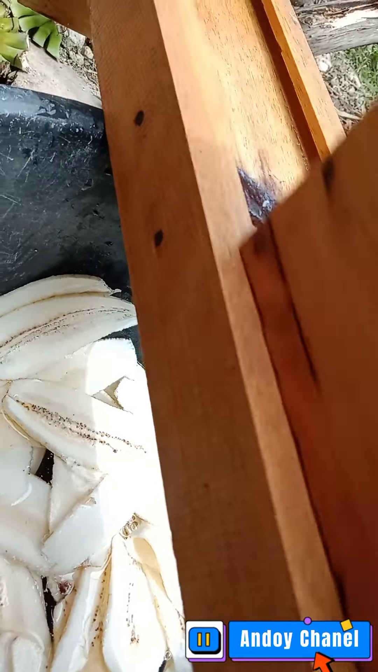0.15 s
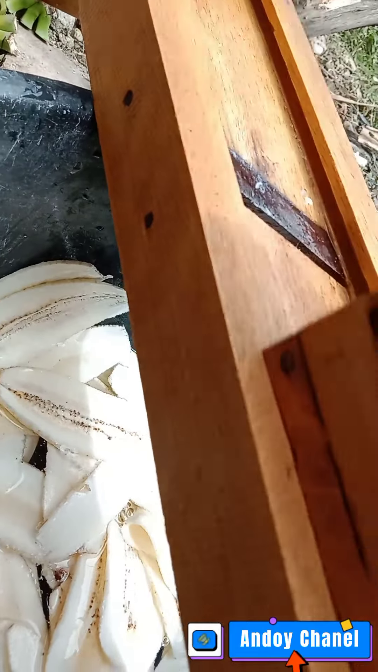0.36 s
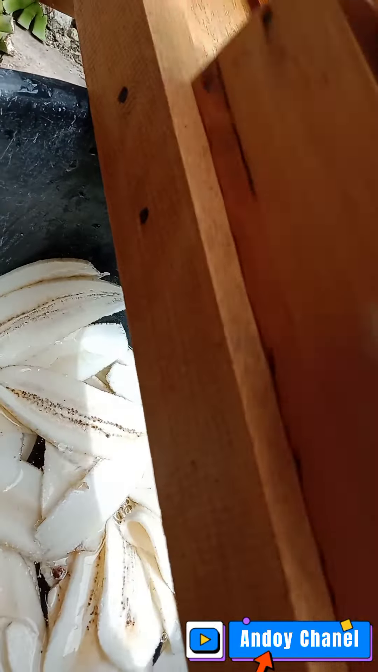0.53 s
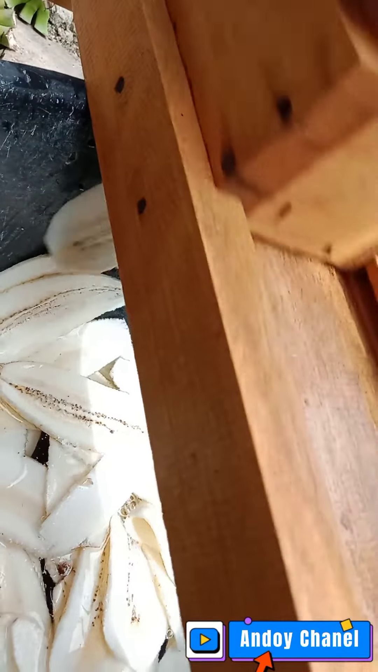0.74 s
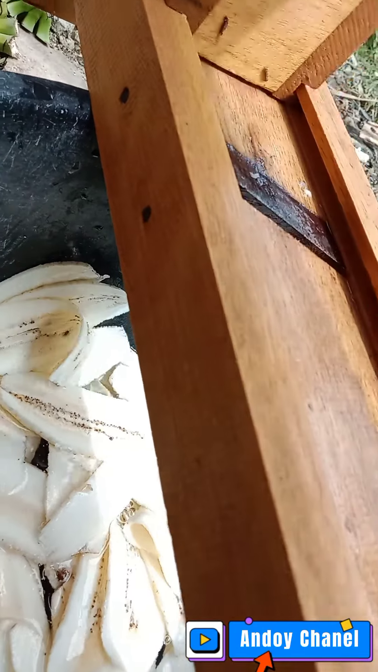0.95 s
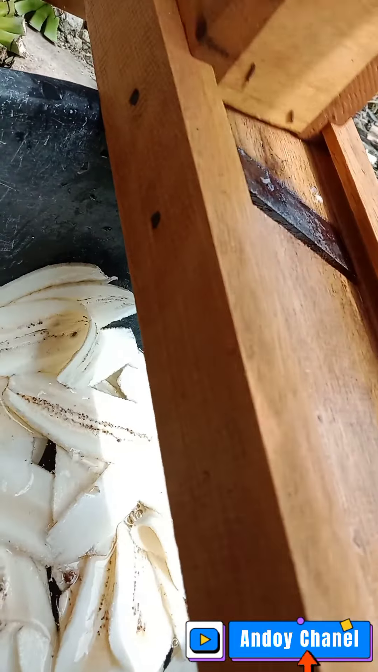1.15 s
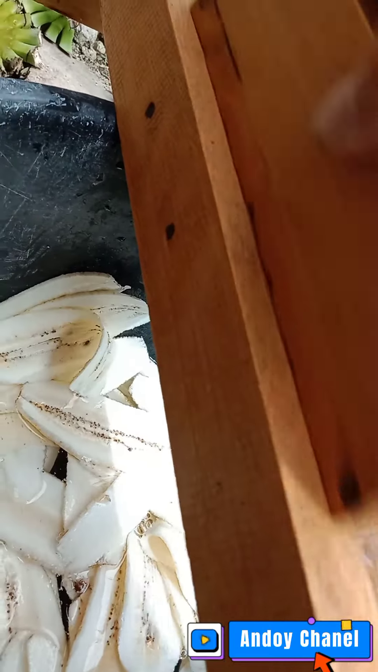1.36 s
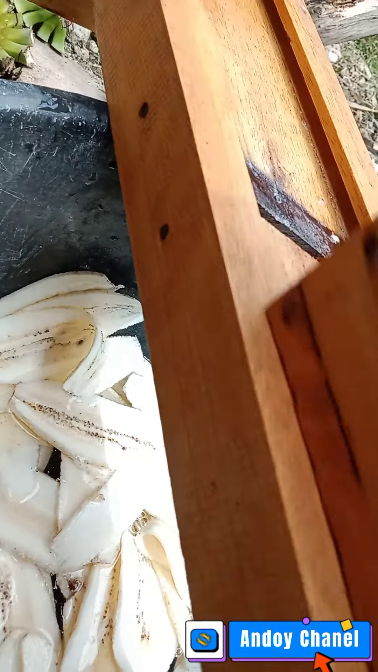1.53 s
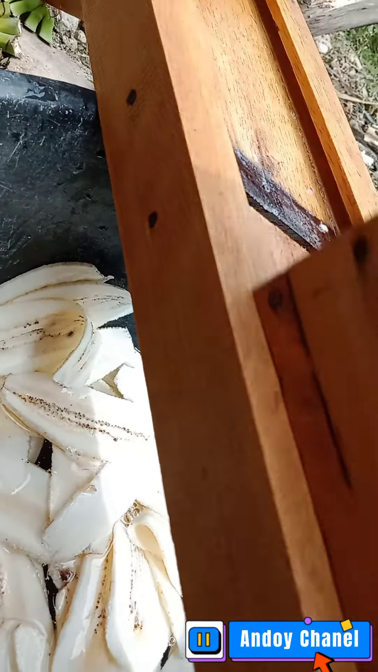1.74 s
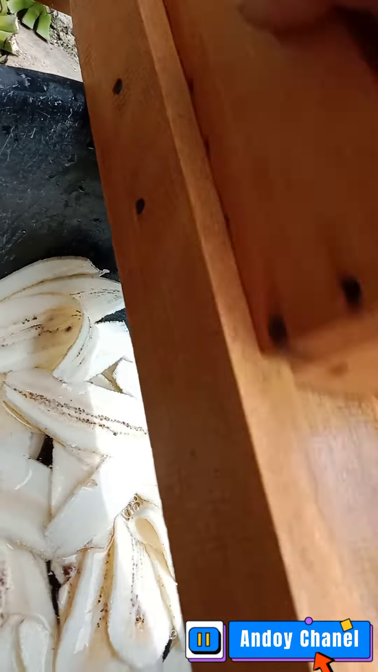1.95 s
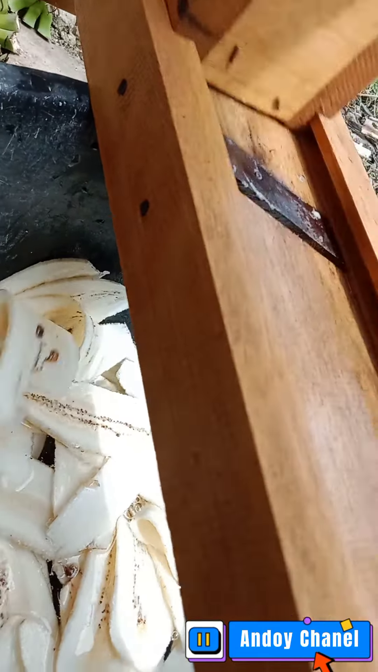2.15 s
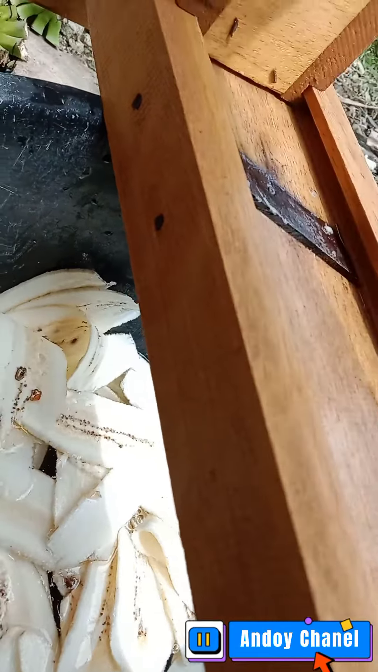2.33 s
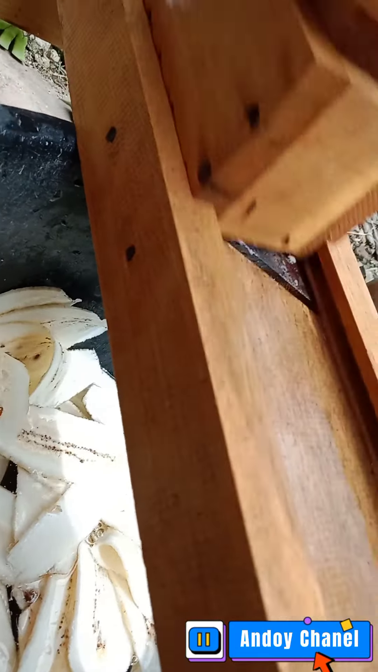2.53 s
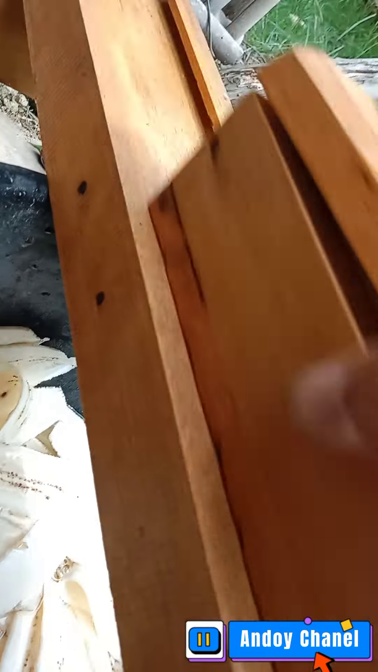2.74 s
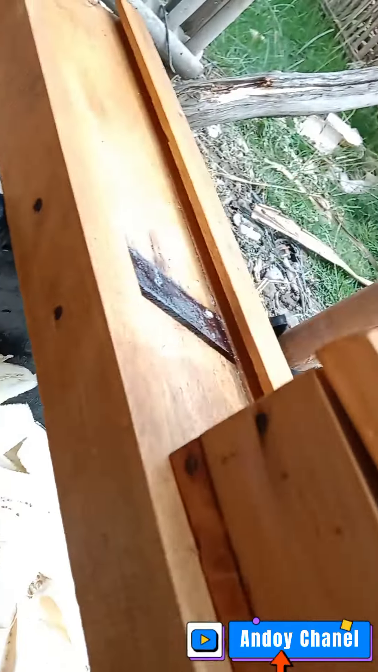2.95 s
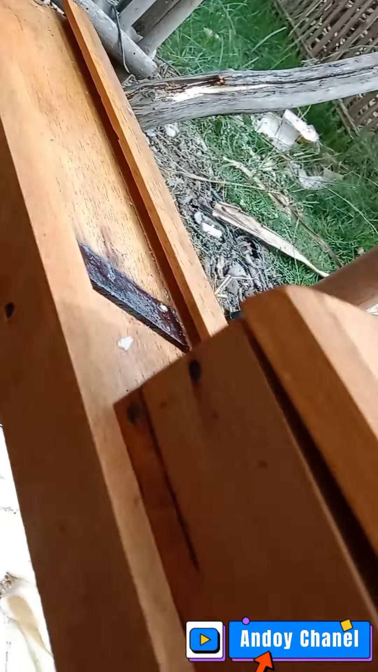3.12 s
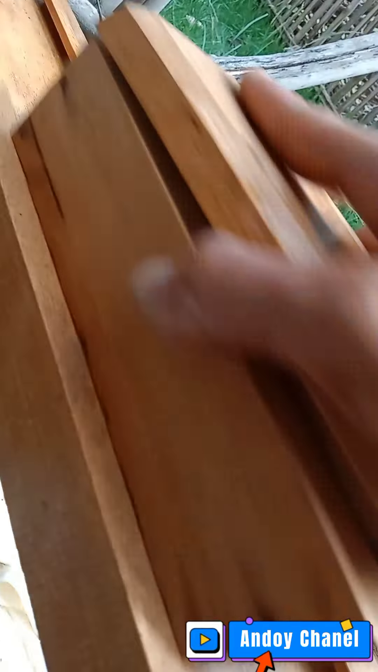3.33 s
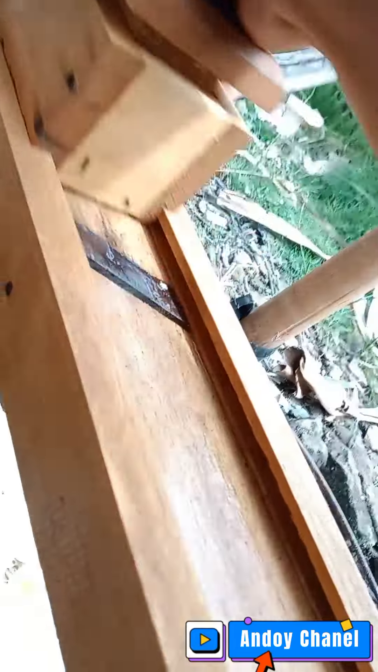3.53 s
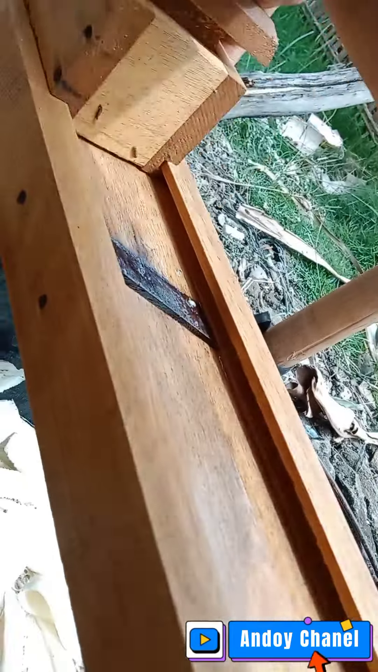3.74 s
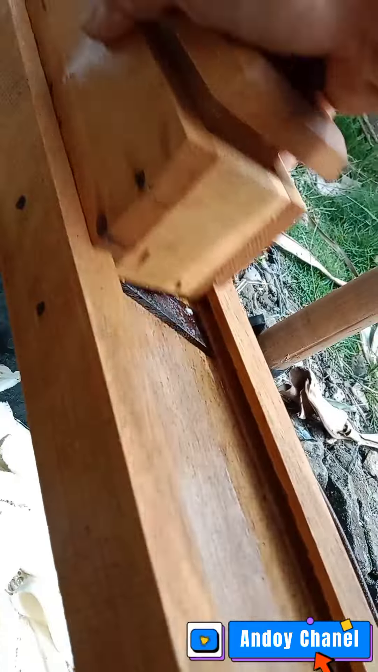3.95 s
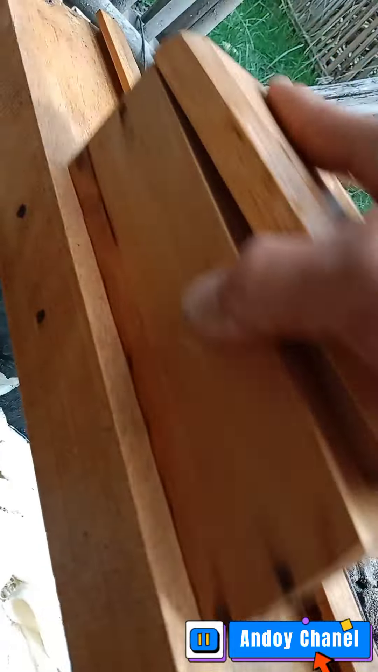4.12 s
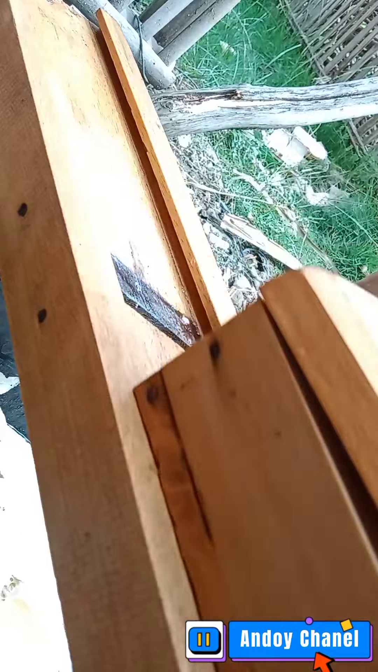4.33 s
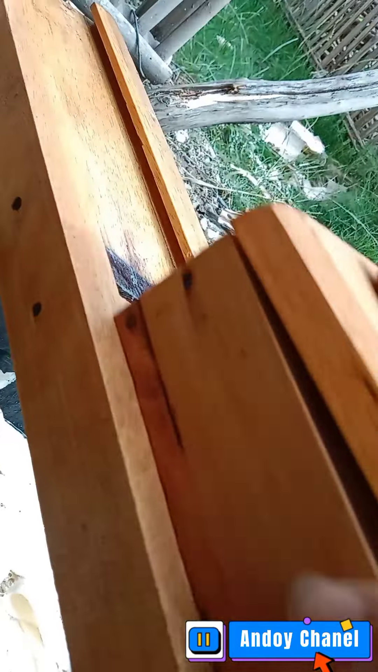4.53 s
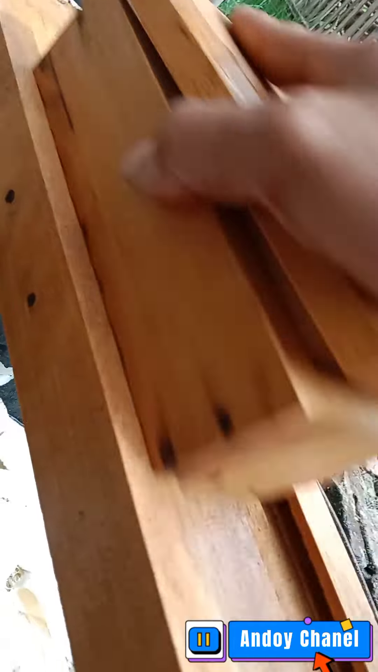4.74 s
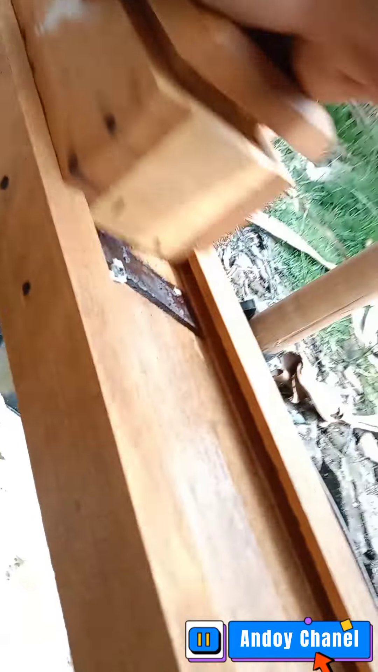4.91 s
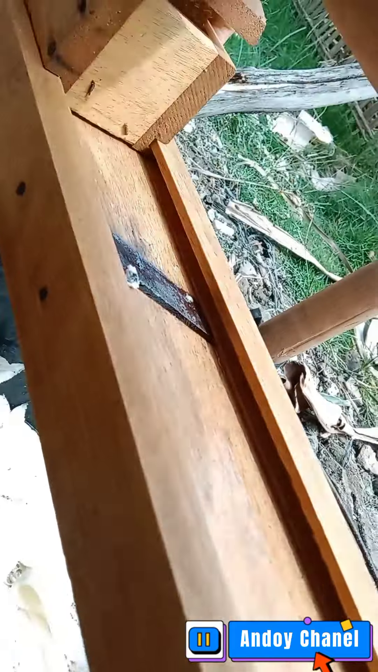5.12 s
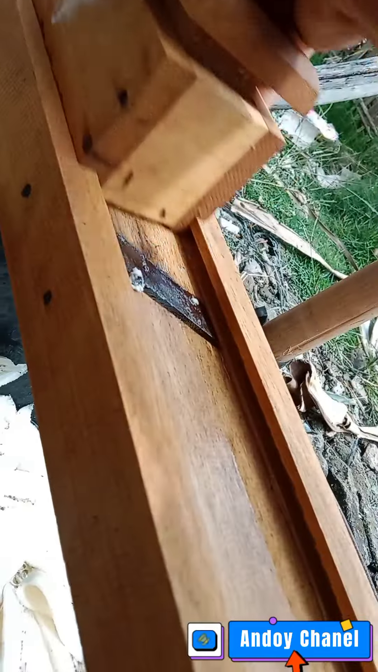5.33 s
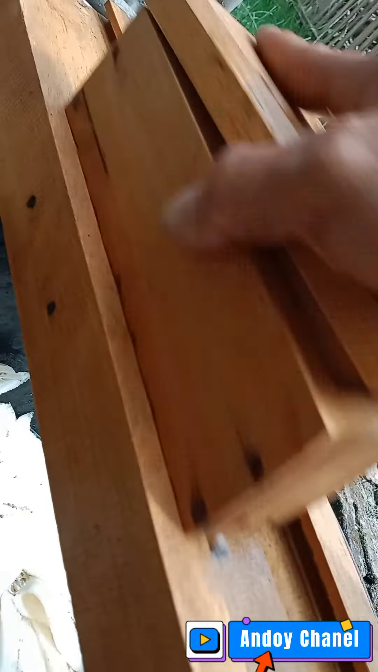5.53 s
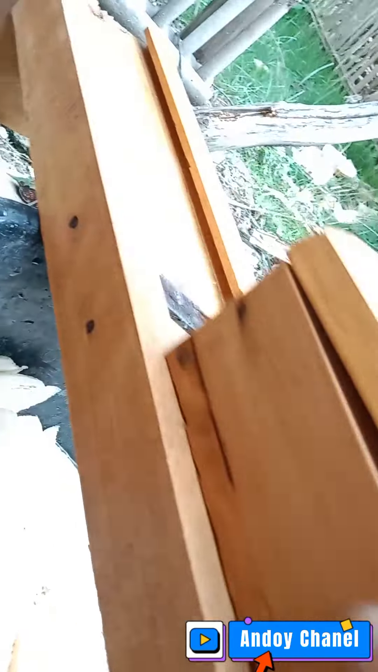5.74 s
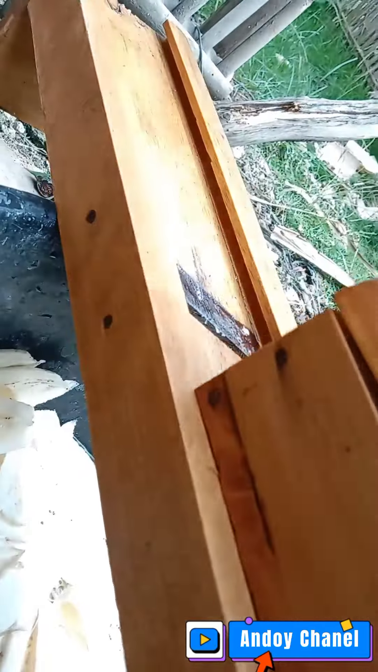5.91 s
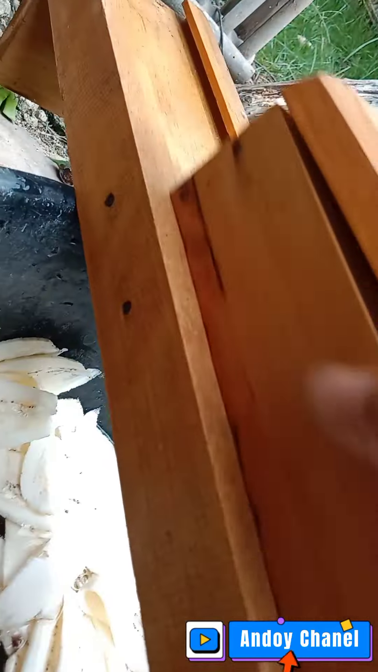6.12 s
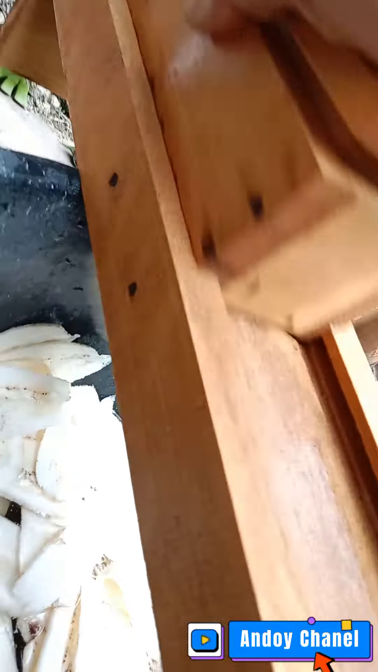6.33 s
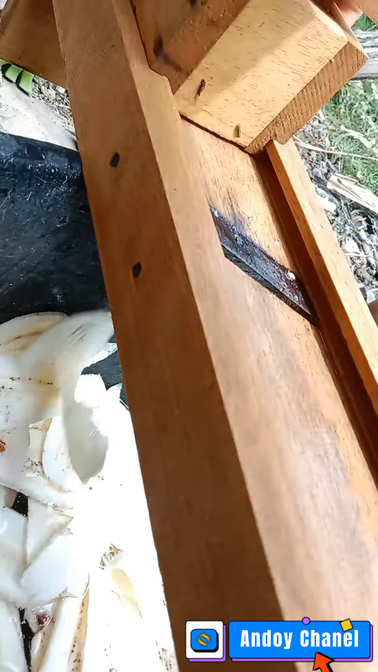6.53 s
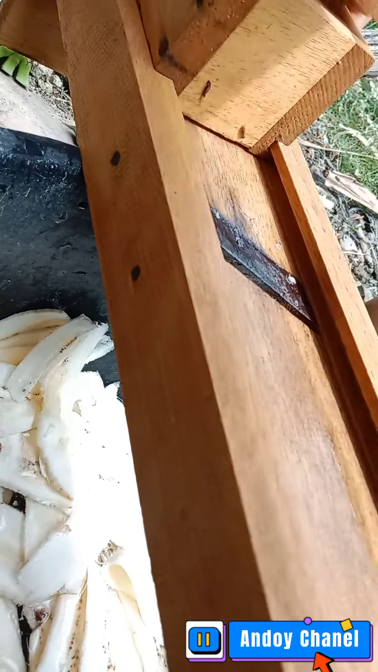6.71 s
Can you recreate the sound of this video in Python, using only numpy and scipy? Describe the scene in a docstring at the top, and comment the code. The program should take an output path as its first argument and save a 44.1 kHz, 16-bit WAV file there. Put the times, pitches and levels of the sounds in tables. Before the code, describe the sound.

Very close and dry outdoors, a wooden box holding bananas rubs along a plank with a set-in blade. Softer backward scrapes alternate with forward pushes that swell into a short, loud, woody rasp as the blade cuts, then slow with a faint groan. Hollow knocks and small bumps mark the turns, with occasional gritty scuffs and thin squeaks. Five slices come about every 1.4 seconds over almost silent air.

```python
"""Slicing bananas on a plank

Outdoors and close up, a wooden box of bananas is pushed to and fro along a plank with a set-in blade. Tiny
slips of the wood grain excite box and plank: a loud rasp in each slice, rubbing around it, a scrape on the way
back that is a little louder than that rubbing. Each push ends in a stick-slip groan. Knocks and bumps ring the
wood, edges scuff as filtered noise, slides squeak as unsteady tones, and noise makes the bench and the air."""
import sys
import numpy as np
from scipy import signal
from scipy.fft import rfft, irfft, next_fast_len
from scipy.io import wavfile

SR = 44100
rng = np.random.default_rng(int(sys.argv[2]) if len(sys.argv) > 2 else 0)


def wav_record(signal):
    """Record a signal, one row per channel, as 16-bit PCM in the file named by sys.argv[1]."""
    frames = np.transpose(np.atleast_2d(signal))
    bounded = np.clip(frames, -1, 1)
    # unit amplitude maps onto the largest positive 16-bit level
    quanta = np.round(bounded * 32767).astype(np.int16)
    wavfile.write(sys.argv[1], SR, quanta)


N = 302967
TIME = np.arange(N) / SR

# resonances of box and plank under friction, with relative levels for each kind of stroke:
# [f/Hz, width/Hz, drawn back/dB, pushed/dB, cutting/dB]
RESONANCES = [(323, 174, 0.5, -0.5, -7), (386, 130, -5, -2, 10.5), (727, 69, 11, 5, 0.3),
              (855, 198, -2.5, 7, -4), (1298, 332, 3.5, -6, -6), (1476, 336, 5.5, 6.5, -7),
              (1720, 360, 1, -6, -8.5), (2214, 190, -33, -11, -11.5), (2637, 620, -9, -0.5, -16.5),
              (3140, 530, -6, 2, -14.5), (3622, 590, -4.5, 0, -10.5), (4460, 150, -13, -26, -13),
              (4870, 1030, -2, -2.5, -11), (5190, 870, -6, -5, -22.5), (5700, 1420, 0, -1, -6),
              (6010, 2170, -25.5, -23.5, -13), (6710, 760, -4, -5, -12.5), (7700, 650, -23.5, -16, -38.5),
              (13230, 3170, -16, -15, -19.5), (14850, 3100, -10, -8, -18)]


def amp(db):
    """Decibels to gain."""
    return 10 ** (np.asarray(db) / 20)


def decibels(gain):
    """Gain to decibels."""
    return 20 * np.log10(np.maximum(gain, 1e-6))


def unit(x):
    """Scales to rms 1."""
    return x / np.sqrt(np.mean(x ** 2) + 1e-20)


def add(mix, s, sound):
    """Adds a sound to the mix at time s in seconds."""
    part = mix[max(round(s * SR), 0):][:len(sound)]
    part += sound[:len(part)]


def coloured(points):
    """Steady noise of rms 1, its spectrum drawn through (Hz, dB) points."""
    hz, db = np.transpose(points)
    size = next_fast_len(N)
    gain = amp(np.interp(np.log(np.fft.rfftfreq(size, 1 / SR) + 1), np.log(hz), db))
    return unit(irfft(rfft(rng.standard_normal(size)) * gain, size)[:N])


def wander(length, hz):
    """Smooth random motion of rms 1, up to about hz."""
    size = next_fast_len(length)
    gain = 1 / (1 + (np.fft.rfftfreq(size, 1 / SR) / hz) ** 2)
    return unit(irfft(rfft(rng.standard_normal(size)) * gain, size)[:length])


def bounce(x, ripple_db, path):
    """Each place on the plank has its own fine peaks from waves bouncing in the wood; they blend on the way."""
    size = next_fast_len(len(x) + 2048)
    spectrum, hz = rfft(x, size), np.fft.rfftfreq(size, 1 / SR)
    depth_db = ripple_db / (1 + (hz / 12000) ** 4)  # wood damps the treble, so its peaks are shallow
    out = np.zeros(len(x))
    for place in range(int(path[-1]) + 2):
        # 300 samples, 7 ms, of fading scatter
        echoes = rng.standard_normal(300) * np.hanning(340)[40:] * np.linspace(1, 0, 300)
        scatter = np.sqrt(2) * rfft(echoes / np.linalg.norm(echoes), size)
        peaks = np.exp(depth_db * np.log(10) / 20 * scatter)
        nearness = np.cos(np.pi / 2 * np.clip(path - place, -1, 1))
        out += nearness * unit(irfft(spectrum * peaks, size)[:len(x)])
    return out


def scrape(t, rub_db, body_db, boom_db, mode_db, slips_per_s, grain_db, chatter_db, chatter_hz,
           ripple_db, places_per_s):
    """One stroke: a stream of tiny slips of the wood grain excites the resonances of box and plank."""
    # dips between the resonances; positive levels lift instead: [f/Hz, width/Hz, level/dB]
    anti_resonances = [(595, 130, 2.5), (1100, 99, 0), (2057, 420, -5), (4140, 550, -1)]
    n = len(t)
    size = next_fast_len(n + 2048)
    hz = np.fft.rfftfreq(size, 1 / SR)

    # a few large grains among many small ones, over a finer hiss, chattering in level
    grain_size = amp(grain_db * np.minimum(rng.exponential(1, n), 4))
    slips = rng.standard_normal(n) * grain_size * (rng.random(n) < slips_per_s / SR)
    slips = unit(slips) + .5 * rng.standard_normal(n)
    slips *= amp(chatter_db * wander(n, chatter_hz))

    # louder rubbing means faster sliding; places_per_s holds where the rubbing is at -40 dB
    path = places_per_s * np.cumsum(amp(np.minimum(rub_db + 40, 2))) / SR
    force = rfft(bounce(slips, ripple_db, path), size)
    for notch_hz, notch_width, notch_db in anti_resonances:
        force = force * amp(notch_db * np.exp(-(2 * (hz - notch_hz) / notch_width) ** 2))

    centre, width = np.transpose(RESONANCES)[:2, :, None]
    power = (amp(mode_db)[:, None] / (1 + (2 * (hz - centre) / width) ** 2)) ** 2
    # four families of resonances: plank boom, box body, grain rasp, top hiss
    family = np.digitize(centre[:, 0], [550, 2000, 4000])
    rasp_db = rub_db - 9.0 - 0.054 * np.minimum(rub_db + 50, 0)
    dull_db = 0.13 * np.minimum(rub_db + 48, 0)  # a slow slide loses its treble first
    hiss_db = rub_db - 2.48 + dull_db
    out = np.zeros(n)
    for k, level_db in enumerate([boom_db, body_db, rasp_db, hiss_db]):
        response = np.sqrt(power[family == k].sum(0))
        out += amp(level_db) * unit(irfft(force * response, size)[:n])
    return out


def cuts(shake):
    """The blade bites, rasps through the fruit and lets go; the bench shakes more as it goes."""
    # the blade going through the fruit; swell is in the middle, fade along the whole cut:
    # [t/s, biting in/s, length/s, rasp/dB, body/dB, swell/dB, fade/dB, bench shake/dB]
    slices = [(0.667, .034, 0.21, -30.5, -31.5, 5, 5.5, -53), (1.97, 0.052, 0.19, -29, -30, 4, 6, -49),
              (3.422, 0.082, 0.17, -30.5, -33, 5, 2.5, -66),
              (4.741, .085, 0.253, -29.5, -31.5, -0.5, 12.5, -54),
              (6.248, 0.045, .2, -30, -33, 4, 0.5, -64)]
    release_s = 0.02
    body_swell_db = 3.5  # the body of the box speaks most in the thick of the fruit
    boom_offset_db, boom_rise_db = -30.5, 34.5  # counted from the body level, growing along the cut
    out = np.zeros(N)
    for start, attack, length, rasp_db, body_db, swell_db, fade_db, shake_db in slices:
        t = np.arange(0, length, 1 / SR)
        arch = np.sin(np.pi * t / length)
        from_middle = t / length - .5
        bite_in = np.sin(np.pi / 2 * np.minimum(t / attack, 1)) ** 2
        gate = bite_in * np.minimum((length - t) / release_s, 1)
        bite_db = decibels(gate) + swell_db * arch - fade_db * from_middle
        body = body_db + bite_db + body_swell_db * (arch - 1)
        boom = body + boom_offset_db + boom_rise_db * from_middle
        add(out, start, scrape(t, rasp_db + bite_db, body, boom, np.transpose(RESONANCES)[4],
                               slips_per_s=4000, grain_db=1.05, chatter_db=-1.86, chatter_hz=130,
                               ripple_db=4.0, places_per_s=16.2))
        growing = gate * np.sin(np.pi / 2 * t / length)
        add(out, start, amp(shake_db) * growing * np.interp(start + t, TIME, shake))
    return out


def stroke_speed(start, rise, brake, launch, steepness):
    """Speed of a stroke, 0-1: a first jerk, a smooth gain to top speed, then braking to rest."""
    jerk_s = 0.024
    t = TIME[(TIME >= start) & (TIME < start + rise + brake)]
    age = t - start
    jerk = launch * np.minimum(age / jerk_s, 1)
    gain = jerk + (1 - launch) * np.sin(np.pi / 2 * np.minimum(age / rise, 1))
    braking = np.cos(np.pi / 2 * np.clip((age - rise) / brake, 0, 1)) ** steepness
    return t, gain * braking


def slide_levels(t, speed, boom_at, rub_db, body_db, boom_db, body_law, rumble_db):
    """Rubbing, body and boom in dB: they follow the speed; the plank booms as the weight crosses the blade."""
    boom_width_s = 0.067
    crossing = amp(boom_db) * np.exp(-((t - boom_at) / boom_width_s) ** 2)
    boom = crossing + amp(body_db + rumble_db) * np.sqrt(speed)
    return rub_db + decibels(speed), body_db + body_law * decibels(speed), decibels(boom)


def bench_rumble(t, speed, shake):
    """The bench shakes as the box slides and takes a moment to settle."""
    settle_s = 0.033
    keep = np.exp(-1 / (settle_s * SR))
    drive = np.interp(TIME, t, np.sqrt(speed), 0, 0) + 1e-9
    return shake * signal.lfilter([1 - keep], [1, -keep], drive)


def stick_slip(length, hz, glide, db, jitter, jitter_hz, overtone_db):
    """An unsteady tone of sticking and slipping, with its second harmonic; it swells and dies in one arch."""
    u = np.linspace(0, 1, round(length * SR))
    sag = 1 - 0.03 * (2 * u - 1) ** 2  # the pitch sags by 3 % at both ends
    pitch = hz * 2 ** (glide * (u - .5)) * sag
    phase = 2 * np.pi * np.cumsum(pitch * (1 + jitter * wander(len(u), jitter_hz))) / SR
    overtone = np.sin(2 * phase) * (2 * pitch < SR / 2)  # left out above the highest possible pitch
    tone = np.sin(phase) + amp(overtone_db) * overtone
    return unit(tone) * (4 * u * (1 - u)) ** 0.63 * amp(db + 1.9 * wander(len(u), 90))


def pushes(shake):
    """Grain slips rub on the way forward, and a stick-slip groan sounds as the box slows."""
    # the box pushed forward; first jerk is a share of top speed, boom is of the plank:
    # [t/s, speeding up/s, braking/s, first jerk/0-1, rubbing/dB, body/dB, boom/dB,
    #  bench shake/dB, groan/dB]
    forward_strokes = [(.415, 0.39, 0.35, 0.18, -38, -42.5, -42, -58.5, -53),
                       (1.735, 0.38, 0.34, 0.075, -38, -44, -38.5, -58.5, -51),
                       (3.145, 0.38, .34, 0.013, -39, -43.5, -42, -63, -57),
                       (4.42, 0.51, 0.36, 0.12, -39.5, -46, -40.5, -61.5, -69),
                       (5.975, 0.41, 0.33, 0.07, -41.5, -46, -61, -63, -59.5)]
    boom_lead_s = 0.0066  # the boom peaks this long before top speed
    groan_hz, groan_s, groan_lead_s = 920, 0.13, .17  # the lead is counted back from the end of the push
    out = np.zeros(N)
    for start, rise, brake, launch, rub_db, body_db, boom_db, shake_db, groan_db in forward_strokes:
        t, speed = stroke_speed(start, rise, brake, launch, steepness=2.7)
        levels = slide_levels(t, speed, start + rise - boom_lead_s, rub_db, body_db, boom_db,
                              body_law=1.36, rumble_db=-19)
        add(out, start, scrape(t, *levels, np.transpose(RESONANCES)[3], slips_per_s=9900,
                               grain_db=1.4, chatter_db=1.74, chatter_hz=72.7,
                               ripple_db=5.0, places_per_s=21.62))
        out += amp(shake_db) * bench_rumble(t, speed, shake)
        groan = stick_slip(groan_s, groan_hz, 0, groan_db, jitter=0.07, jitter_hz=170, overtone_db=-60)
        add(out, t[-1] - groan_lead_s, groan)
    return out


def pulls(shake):
    """Dry rubbing by grain slips as the box is drawn back."""
    # the box drawn back; first jerk is a share of top speed, boom is of the plank:
    # [t/s, speeding up/s, braking/s, first jerk/0-1, rubbing/dB, body/dB, boom/dB, bench shake/dB]
    back_strokes = [(-.05, 0.31, 0.15, 0.06, -34.5, -42.5, -46, -58),
                    (1.165, .43, .155, 0.05, -36, -45.5, -39.5, -63.5),
                    (2.471, 0.43, 0.19, 0.13, -38, -46.5, -46.5, -69),
                    (3.89, 0.41, 0.22, 0.32, -37, -44, -48, -68),
                    (5.31, .52, 0.13, 0.2, -39.5, -47, -92, -64),
                    (6.689, 0.88, .13, 0.45, -51.5, -53.5, -62, -57)]
    boom_lead_s = 0.069  # the boom peaks this long before top speed
    out = np.zeros(N)
    for start, rise, brake, launch, rub_db, body_db, boom_db, shake_db in back_strokes:
        t, speed = stroke_speed(start, rise, brake, launch, steepness=3.12)
        levels = slide_levels(t, speed, start + rise - boom_lead_s, rub_db, body_db, boom_db,
                              body_law=1.3, rumble_db=-16.5)
        add(out, start, scrape(t, *levels, np.transpose(RESONANCES)[2], slips_per_s=9000,
                               grain_db=1.4, chatter_db=-1.5, chatter_hz=92.5,
                               ripple_db=4.0, places_per_s=21.02))
        out += amp(shake_db) * bench_rumble(t, speed, shake)
    return out


def ring(t, tone_db, thump_db, spot_hz, thump_hz, focus, contact):
    """The modes after one blow: the spot struck sets strengths; signs and slight detuning are random."""
    # what the slicer rings with when struck: [f/Hz, relative level/dB, time to fall by 60 dB/s]
    struck_modes = [(215.6, -14, 0.17), (243, -9, 0.14), (308.2, -17, 0.17), (382.8, -5, .11),
                    (466.7, -2, 0.056), (672, -8, 0.036), (761.4, -11, 0.067), (830.5, -7.5, 0.07),
                    (930, -3.5, 0.059), (1097, 3, 0.023), (1230, 1.5, 0.032), (1333, -2.5, 0.042),
                    (1564, -6.5, 0.044), (1690, 6.5, 0.017), (1946, -9.5, 0.04), (2320, -19.5, 0.1),
                    (2720, -23.5, 0.076), (3210, -4.5, 0.042), (3760, -6.5, 0.016)]
    hz, db, t60 = np.transpose(struck_modes)[:, :, None]
    is_low = hz[:, 0] < 550
    sense = rng.choice([-1, 1], hz.shape)
    detune = 1 + np.where(is_low, .05, .012)[:, None] * rng.standard_normal(hz.shape)
    modes = sense * amp(db - 60 * t / t60) * np.sin(2 * np.pi * hz * detune * t)
    # modes far from the favoured pitch are weaker; a longer contact starts more softly
    near_spot = modes / (1 + (focus * np.log2(hz / spot_hz)) ** 2)
    tone = near_spot[~is_low].sum(0) * (1 - np.exp(-(t / contact) ** 2))
    near_thump = modes / (1 + (1.9 * np.log2(hz / thump_hz)) ** 2)
    thump = near_thump[is_low].sum(0) * (1 - np.exp(-t / 0.0028))
    thump *= amp(1.6 * wander(len(t), 47))  # the loose plank rocks as it rings
    return amp(tone_db) * unit(tone) + amp(thump_db) * unit(thump)


def knocks(shake):
    """Hard blows: the ring, a short bright crack from the edge that lands, and a jolt of the bench."""
    # hard wood-on-wood knocks, levels before the gains below; f is what the spot struck favours:
    # [t/s, ring level/dB, low thump/dB, crack/dB, f/Hz, f in the thump/Hz, bench shake/dB]
    blows = [(0.142, -11, -48, -94, 1230, 370, -54.5), (0.522, -21.5, -37, -45.5, 750, 302, -60),
             (1.16, -8.5, -32, -34.5, 980, 226, -38.5), (2.059, -16.5, -30.5, -38, 720, 380, -46),
             (2.07, -20, -29.5, -23.5, 680, 260, -52.5), (2.098, -23, -30.5, -45.5, 740, 325, -30),
             (2.13, -16, -32.5, -58, 790, 387, -43.5), (2.462, -8, -30.5, -34, 935, 222, -29),
             (3.882, -12.5, -34.5, -38, 1010, 236, -41.5), (3.968, -15.5, -41, -40, 1290, 361, -45),
             (4.905, -22, -26.5, -61, 720, 385, -63), (4.929, -14, -32.5, -63, 815, 360, -44),
             (4.948, -14, -31, -43.5, 773, 400, -41), (4.976, -9.5, -23, -33, 686, 450, -35),
             (5.297, -15, -36.5, -41, 950, 245, -44), (5.388, -22.5, -44, -70, 1190, 232, -46),
             (6.767, -14.5, -34, -38.5, 1310, 260, -55)]
    # colour of the crack: [f/Hz, relative level per Hz/dB]
    crack_colour = [(700, -19.5), (1800, -4), (3300, 4.5), (4200, -2.5), (5300, 6.5), (6700, 0.5),
                    (8000, -19.5), (10000, -30), (14000, -17.5)]
    ring_gain_db, thump_gain_db, crack_gain_db = -26.0, -10.5, 9
    crack_t60_s, crack_rise_s = 0.037, 0.00027
    shake_t60_s, shake_rise_s = 0.16, 0.018
    lag_s = .0016  # every blow sounds this much after its listed time
    second_edge_s, second_edge_db = .004, -8  # the box lands on one edge, then on the other
    out, t = np.zeros(N), np.arange(SR // 4) / SR
    bright = coloured(crack_colour)
    snap_shape = amp(-60 * t / crack_t60_s) * (1 - np.exp(-t / crack_rise_s))
    for s, ring_db, thump_db, crack_db, spot_hz, thump_hz, shake_db in blows:
        # each crack takes its own stretch of the noise
        snap = bright[round(s * SR) // 2:][:len(t)] * snap_shape
        crack = amp(crack_db + crack_gain_db) * snap
        jolt_shape = amp(shake_db - 60 * t / shake_t60_s) * (1 - np.exp(-t / shake_rise_s))
        jolt = np.interp(s + t, TIME, shake) * jolt_shape
        strike = (ring_db + ring_gain_db, thump_db + thump_gain_db, spot_hz, thump_hz)
        first = ring(t, *strike, focus=1, contact=0.0027) + crack + jolt
        add(out, s + lag_s, first)
        again = ring(t, *strike, focus=1.9, contact=0.0012) + crack
        delay = second_edge_s * rng.uniform(.7, 1.3)
        add(out, s + lag_s + delay, amp(second_edge_db) * again)
    return out


def bumps():
    """Soft bumps wake mostly the few modes near the spot struck."""
    # soft bumps of the box against the rails, levels before the gains below; f is favoured by the spot:
    # [t/s, ring level/dB, low thump/dB, f/Hz]
    touches = [(.035, -28.5, -56, 764), (.084, -28.5, -59, 790), (.35, -16, -48, 814),
               (0.377, -18.5, -43.5, 940), (0.429, -26, -48, 900), (0.443, -17.5, -35, 970),
               (.455, -19.5, -48, 720), (0.677, -17.5, -67, 1300), (.751, -15, -34, 866),
               (.767, -12, -39, 775), (.826, -22, -33, 700), (1.145, -38, -62, 900), (1.418, -19, -50, 780),
               (1.773, -25.5, -53.5, 904), (1.853, -25, -39, 760), (2.064, -5, -39, 690),
               (2.2, -29.5, -42.5, 630), (2.73, -25, -53, 740), (3.096, -58, -65, 920),
               (3.14, -55, -72.5, 920), (3.233, -25, -57, 872), (3.902, -34, -34, 840),
               (4.168, -18.5, -61, 757), (4.525, -32, -52, 920), (4.633, -41, -40, 720),
               (5.204, -41, -69, 870), (5.313, -36, -39.5, 890), (5.332, -36, -44, 890),
               (5.43, -28, -49.5, 894), (6.106, -31.5, -48, 750), (6.355, -28, -42.5, 890),
               (6.798, -27, -46, 900), (6.831, -29.5, -62, 1060)]
    ring_gain_db, thump_gain_db, thump_hz = -27, -11, 385
    out, t = np.zeros(N), np.arange(SR // 4) / SR
    for s, ring_db, thump_db, spot_hz in touches:
        add(out, s, ring(t, ring_db + ring_gain_db, thump_db + thump_gain_db, spot_hz, thump_hz,
                         focus=6.2, contact=0.002))
    return out


def scuffs():
    """Coloured noise for a catching edge of the box: it bites at once, grates and lets go."""
    # gritty scuffs, levels before the gain below: [t/s, length/s, level/dB]
    catches = [(0.357, 0.067, -66), (1, .002, -39.5), (1.412, 0.02, -33), (1.69, .09, -67),
               (2.724, 0.02, -35.5), (2.934, 0.03, -38.5), (3.979, 0.26, -40), (4.165, 0.0083, -24),
               (4.429, 0.062, -36), (4.535, .13, -35.5), (5.65, 0.047, -37.5), (5.818, 0.099, -44.5),
               (5.984, 0.045, -43.5), (6.162, 0.094, -37.5), (6.69, 0.052, -50.5)]
    # colour of a scuff: [f/Hz, relative level per Hz/dB]
    grit_colour = [(400, -70), (720, -1), (1100, -27), (1700, 1), (2250, 1.5), (3100, 8.5), (4200, -2.5),
                   (5300, 7), (6800, 0), (9500, -20), (14000, -8)]
    gain_db, ripple_db, places_per_s = 1, 5.5, 10
    attack_share = 0.091  # of the length of a scuff
    out, grit = np.zeros(N), coloured(grit_colour)
    for s, length, db in catches:
        t = np.arange(0, length + 0.0017, 1 / SR)
        grate = unit(bounce(grit[round(s * SR):][:len(t)], ripple_db, places_per_s * t))
        grate *= amp(1.0 * wander(len(t), 200))  # uneven by about 1 dB
        shape = (1 - np.exp(-t / (attack_share * t[-1]))) * np.sqrt(1 - t / t[-1])
        add(out, s, amp(db + gain_db) * grate * shape)
    return out


def squeaks():
    """Thin squeaks and whistles: a squeak and a chirp of the sliding box, and thin steady tones of the ringing
    blade, all nearly pure tones."""
    # [t/s, length/s, f/Hz, glide/octaves, level/dB]
    thin_tones = [(4.44, 0.11, 1550, 0.021, -56.5), (5.037, .075, 14500, -0.019, -45),
                  (5.16, 0.24, 1720, -0.027, -79.5), (5.98, 0.14, 1803, -0.0016, -53),
                  (5.99, 0.16, 2275, -0.018, -57.5), (6.655, 0.0061, 3060, -.05, -43)]
    out = np.zeros(N)
    for start, *squeak in thin_tones:
        add(out, start, stick_slip(*squeak, jitter=0.0077, jitter_hz=500, overtone_db=-26))
    return out


def judders():
    """The box judders at the start of one push: low stick-slip tones with a strong second harmonic."""
    # [t/s, length/s, slips a second/Hz, glide/octaves, level/dB]
    slip_runs = [(3.241, .08, 342, -.06, -46.5), (3.312, 0.1, 328, 0.0062, -47)]
    out = np.zeros(N)
    for start, *judder in slip_runs:
        add(out, start, stick_slip(*judder, jitter=0.0097, jitter_hz=60, overtone_db=-4))
    return out


def bench_shake():
    """Low noise for the shaking bench, in uneven lumps; strokes and blows set how much of it is heard."""
    # colour of the shaking: [f/Hz, relative level per Hz/dB]
    bench_colour = [(25, -49), (42, -22), (60, -4), (88, 1), (125, -6.5), (170, -5.5), (260, -39),
                    (600, -62)]
    lumps_db, lumps_hz = 2.5, 4.7
    return coloured(bench_colour) * amp(lumps_db * wander(N, lumps_hz))


def outdoor_air():
    """Faint steady coloured noise for the outdoor air."""
    # [f/Hz, relative level per Hz/dB]
    air_colour = [(18, -62.5), (30, -33), (180, -45.5), (320, -8), (460, -26), (928, -8.5), (1110, -40.5),
                  (4900, -23.5), (8470, -75), (15000, -39)]
    return amp(-74) * coloured(air_colour)


def scene():
    """Strokes, blows and squeaks on a shaking bench, in still air."""
    shake = bench_shake()
    strokes = cuts(shake) + pushes(shake) + pulls(shake)
    contacts = knocks(shake) + bumps() + scuffs()
    tones = squeaks() + judders()
    out = strokes + contacts + tones + outdoor_air()
    return out[None]


def record(dry):
    """The recorder's band limit: a steep low-pass filter takes away the highest treble."""
    edge_hz = 15800
    low_pass = signal.firwin(511, edge_hz, window=("kaiser", 8), fs=SR)
    return signal.oaconvolve(dry, low_pass[None], "same")


dry = scene()
out = record(dry)
wav_record(out)
```